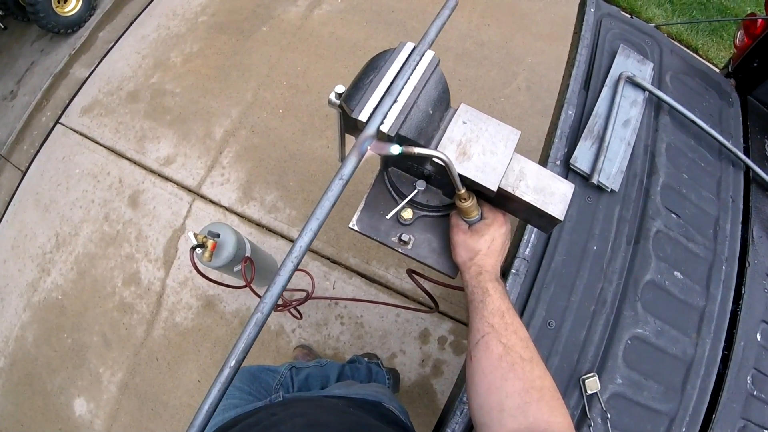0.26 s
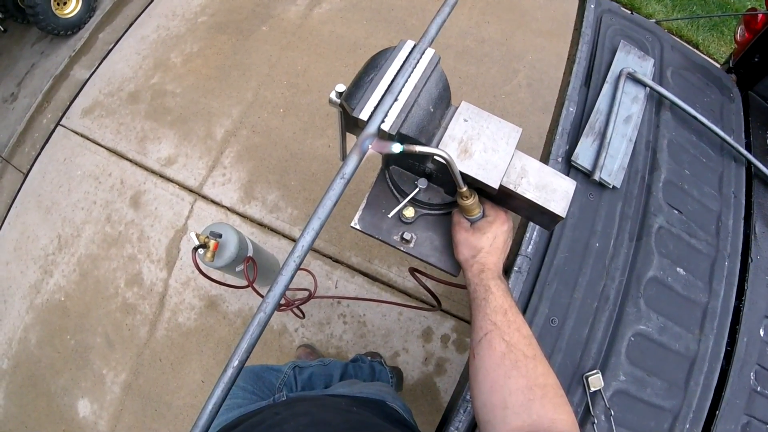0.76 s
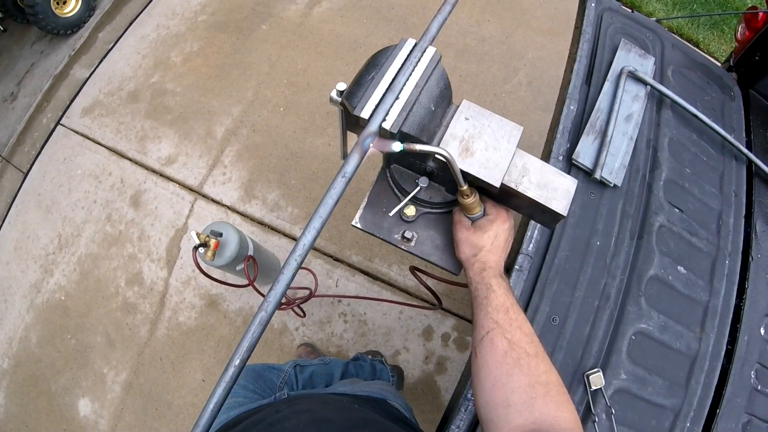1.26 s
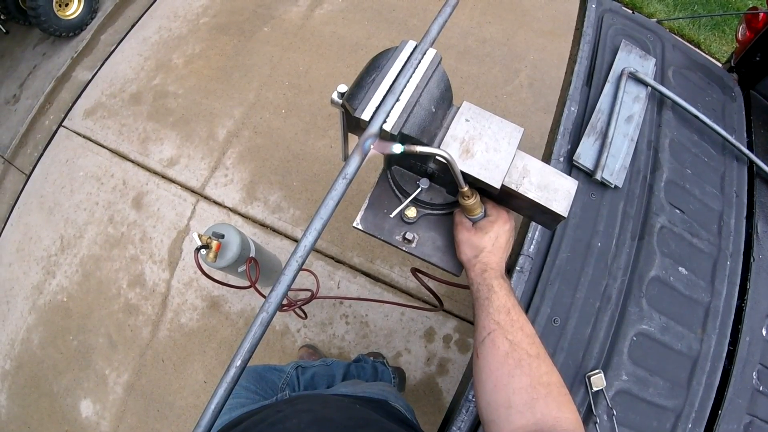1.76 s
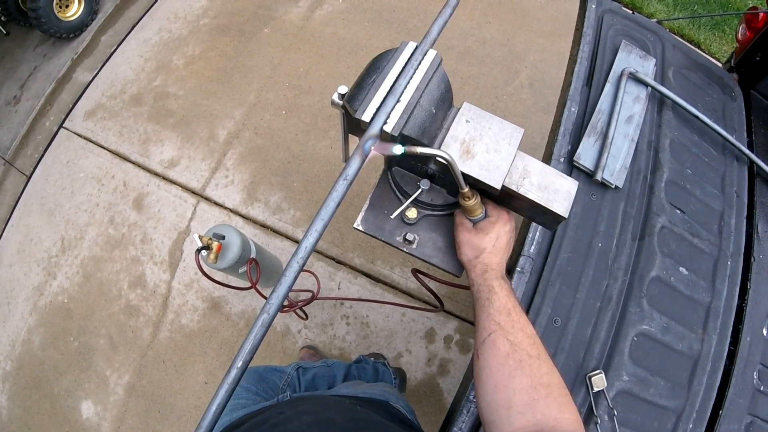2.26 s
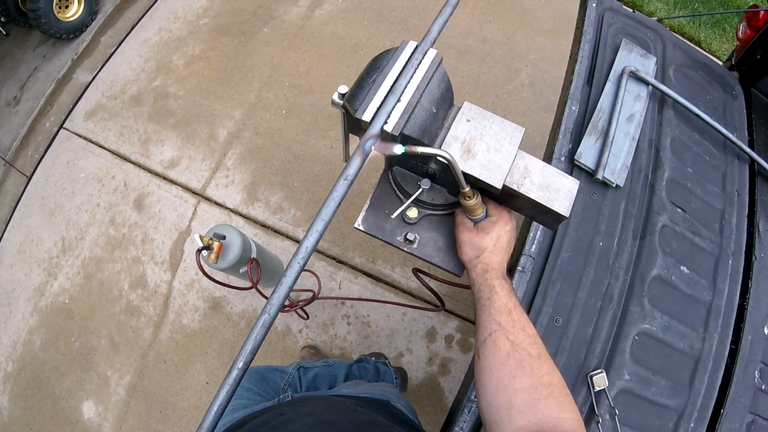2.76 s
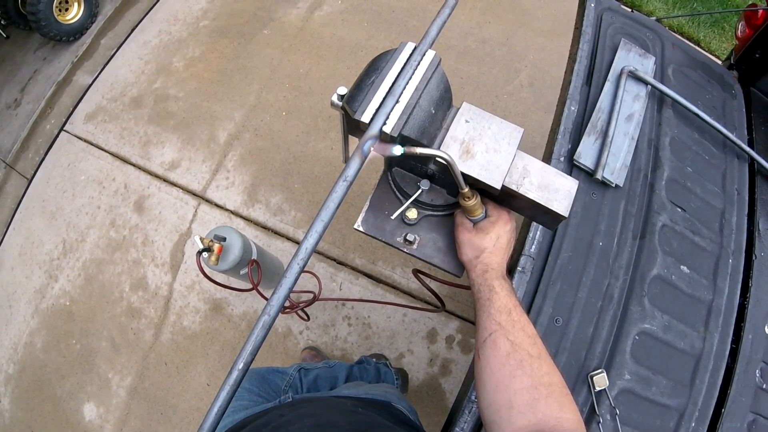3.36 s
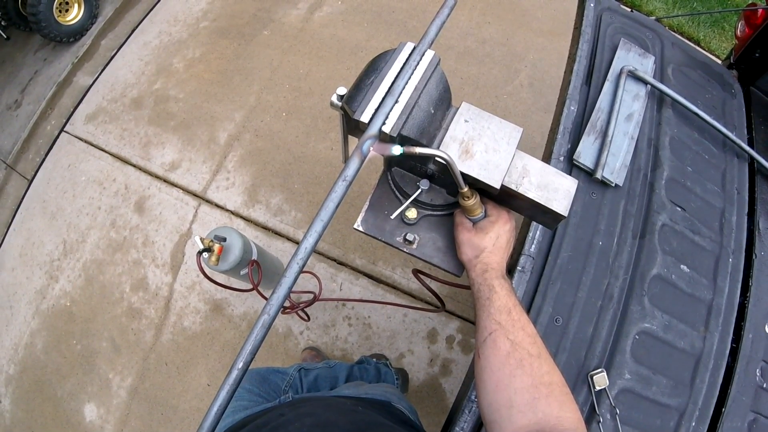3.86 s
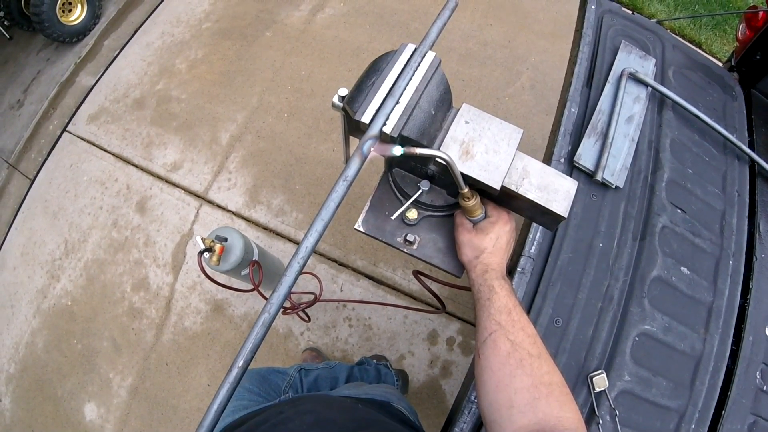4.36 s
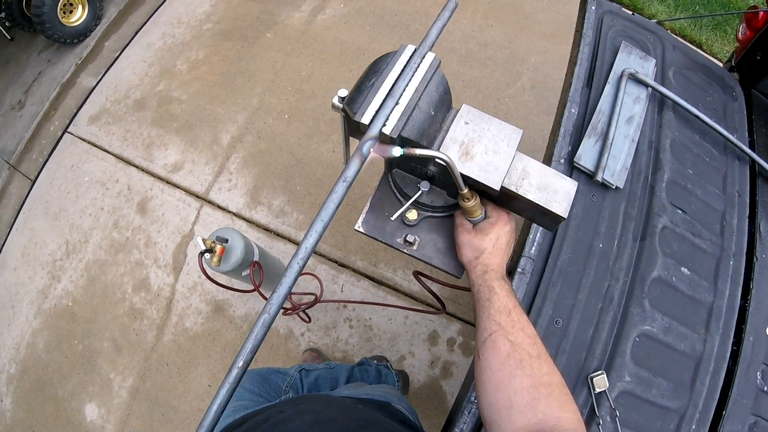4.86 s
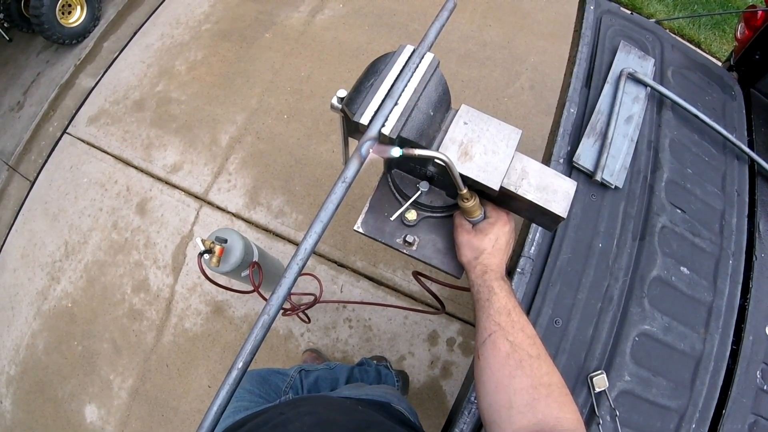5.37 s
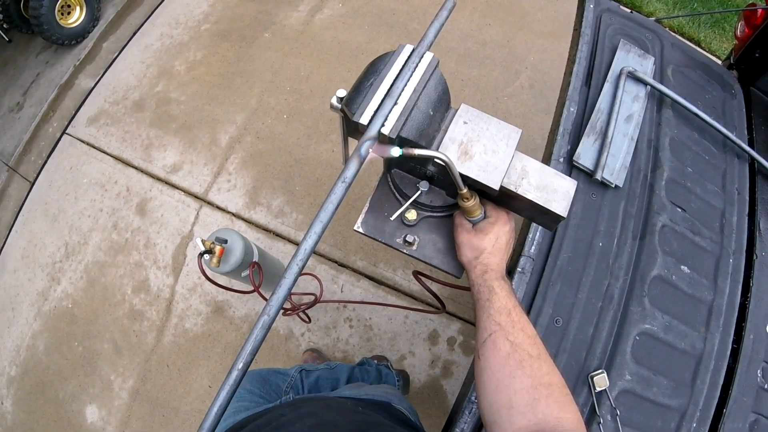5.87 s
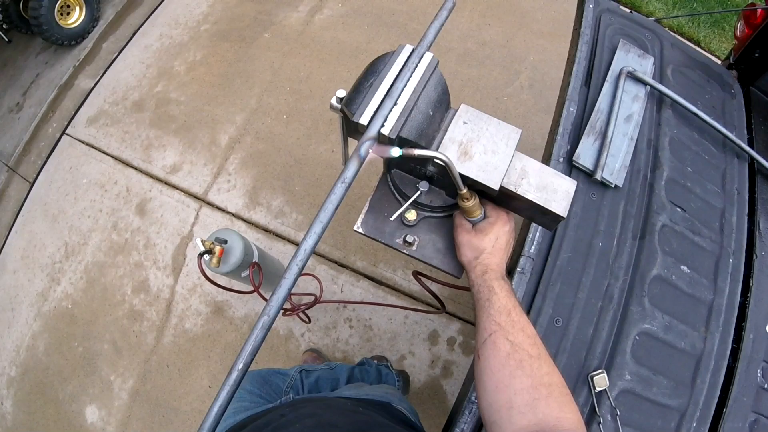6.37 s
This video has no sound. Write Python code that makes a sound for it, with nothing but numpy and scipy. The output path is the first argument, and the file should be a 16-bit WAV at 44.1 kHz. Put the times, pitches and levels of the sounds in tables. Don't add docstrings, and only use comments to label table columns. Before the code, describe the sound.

A gas torch already burning at the start blasts steadily against a steel bar, about an arm's length below a head-worn microphone outdoors. The sound is a loud, dense, bright hiss with a thin low roar and a strong breathy whistle near 5 kHz. It flutters slightly, dips for an instant near five seconds, recovers and continues to the end.

```python
import sys
import numpy as np
from scipy import signal
from scipy.fft import next_fast_len
from scipy.io import wavfile
from scipy.ndimage import uniform_filter1d

SR = 44100
rng = np.random.default_rng(int(sys.argv[2]) if len(sys.argv) > 2 else 0)


def decibels_to_gain(level_db):
    exponent = np.asarray(level_db, float) / 20
    return 10 ** exponent


def put_to_file(sound):
    columns = np.atleast_2d(sound).T
    safe = np.clip(columns, -1, 1)
    whole_steps = np.round(safe * 32767)
    wavfile.write(sys.argv[1], SR, whole_steps.astype(np.int16))


N = 292383
FRAME = 2048


def walk(rows, count, hold):
    steps = rng.standard_normal((rows, count // hold + 1))
    steps = np.repeat(steps, hold, axis=1)[:, :count]
    steps = uniform_filter1d(steps, hold, axis=1)
    steps = uniform_filter1d(steps, hold, axis=1)
    return steps / steps.std()


def band(x, lo_hz, hi_hz):
    return signal.sosfiltfilt(signal.butter(4, [lo_hz, hi_hz], "band", fs=SR, output="sos"), x)


def sag(s):
    # starts_s, lowest_from_s, lowest_to_s, recovered_s, depth_db
    falter = (4.9, 5.04, 5.15, 5.22, -6.5)
    return falter[-1] * np.interp(s, np.sort(falter[:-1]), [0, 1, 1, 0])


def echoes_and_rings(hz):
    # centre_hz, width_hz, height_db
    bells = [(457, 37, 4.5), (580, 194, 5), (746, 71, -9), (948, 132, 9), (1400, 140, 3), (1602, 64, -3),
             (1703, 78, -9), (2280, 600, 7.5), (2654, 213, -6), (2862, 337, 11), (3525, 250, -3.5),
             (3870, 730, 7.5), (4250, 60, -6), (4240, 75, 1), (4881.4, 400, 18.5), (5118, 217, 10),
             (5490, 133, -14), (5944, 510, 10), (6360, 60, -5), (6560, 81, 6), (6467, 270, 6),
             (7090, 410, 5.5), (7490, 290, 11), (9270, 800, 4), (9420, 350, -7.5), (9820, 250, 6),
             (10050, 240, -7), (10720, 650, 12.5), (11230, 370, -20), (11660, 480, 7)]
    return sum(db * np.exp(-np.log(16) * ((hz - f) / width) ** 2) for f, width, db in bells)


def torch(lick_db=0.43, flicker_db=0.18, ring_flicker_db=0.5, jet_flicker_db=1.0):
    # pitch_hz, level_db (per Hz)
    flame_colour = [(20, -36.5), (200, -38), (400, -32.5), (1200, -32), (2000, -34), (3500, -32.5),
                    (4400, -35), (5500, -21), (6800, -31), (8200, -32.5), (9200, -40.5), (10300, -50),
                    (11200, -48), (12300, -62)]
    borders_hz = [1700, 4330, 5520]
    # time_s, flow_db
    gas_flow = [(0.0, 0.5), (1.1, 1.14), (1.4, 0.9), (2.3, 0.16), (2.9, 0.6), (3.5, -0.3), (4.2, -0.5),
                (4.4, -1.5), (5.1, -1.5), (5.4, -0.84), (6.63, -1.0)]
    # level_db, follow (dB per dB of flow), falter_share
    flame_parts = [
        (-39, 1.12, 0.05),
        (-31.5, 0.82, 0.11),
        (-12.5, 0.13, 0.82),
        (-25, 0.93, 0.089),
    ]
    # time_s, ring_hz
    head_tilt = [(0.0, 4988), (4.6, 5003), (4.75, 4965), (5.4, 4946), (5.5, 5026), (6.0, 5040), (6.3, 4980),
                 (6.63, 5020)]
    # time_s, half_length_s, boost_db
    ring_swell_s, ring_swell_half_s, ring_swell_db = (5.4, 0.21, 1.3)

    hz, s, z = signal.stft(rng.standard_normal(N), SR, nperseg=FRAME, noverlap=FRAME * 3 // 4)
    part = np.searchsorted(borders_hz, hz)
    ring = part == 2

    stretch = np.repeat(1 + 0.003 * walk(1, len(s), hold=30), len(hz), axis=0)
    lean = head_tilt[0][1] / np.interp(s, *np.transpose(head_tilt))
    stretch[ring] = lean + 0.002 * walk(1, len(s), hold=8)
    colour_hz, colour_db = np.transpose(flame_colour)
    colour = np.interp(np.log(hz + 1), np.log(colour_hz), colour_db)
    gain = decibels_to_gain(colour[:, None] + echoes_and_rings(hz[:, None] * stretch))

    patches = walk(len(hz) // 32 + 1, len(s), hold=2)[np.arange(len(hz)) // 32]
    patches = uniform_filter1d(patches, size=16, axis=0)
    depth_db = np.array([flicker_db, flicker_db, ring_flicker_db, jet_flicker_db])[part, None]
    gain = gain * decibels_to_gain(lick_db * walk(1, len(s), hold=10) + depth_db * patches)

    flow_db = np.interp(s, *np.transpose(gas_flow))
    levels = []
    for k, (db, follow, falter_share) in enumerate(flame_parts):
        loudness = np.sqrt(np.sum(gain[part == k] ** 2) / gain.size)
        levels.append(decibels_to_gain(db + follow * flow_db + falter_share * sag(s)) / loudness)
    levels = np.array(levels)
    surge_db = 0.5 * walk(1, len(s), hold=3)[0]
    levels[2] *= decibels_to_gain(surge_db + ring_swell_db * np.exp(-((s - ring_swell_s) / ring_swell_half_s) ** 2))
    gain *= uniform_filter1d(levels[part], size=8, axis=0)

    gain *= decibels_to_gain(np.outer(np.clip((hz - 8200) / 1800, 0, 1), sag(s)))
    return signal.istft(z * gain, SR, nperseg=FRAME, noverlap=FRAME * 3 // 4)[1][:N]


def scene():
    return np.tile(torch(), (2, 1))


def limit(x, top_db=-9, squeeze=0.48, react_s=0.0017, from_hz=4300):
    treble = band(x, from_hz, 8600)
    swell = np.abs(signal.hilbert(treble, next_fast_len(N))[:N])
    swell = uniform_filter1d(swell, max(int(react_s * SR), 1))
    gain = decibels_to_gain(2.0) * (1 + (swell / decibels_to_gain(top_db)) ** 2) ** (-squeeze / 2)
    gain *= (1 + (gain * swell / .76) ** 8) ** (-1 / 8)
    return x - treble + treble * gain


def lean_spells(s):
    # start_s, length_s
    long_spells = [(0.106, 0.054), (1.414, 0.12), (1.58, 0.143), (2.477, 0.077), (2.736, 0.075),
                   (3.982, 0.237), (4.335, 0.116), (4.645, 0.112), (5.277, 0.132), (5.809, 0.173),
                   (6.098, 0.17), (6.383, 0.106)]
    blinks_per_s, shortest_s, longest_s = 7, 0.012, 0.045
    draw = rng.random((int(blinks_per_s * N / SR), 2))
    starts = (np.arange(len(draw)) + draw[:, 0]) / blinks_per_s
    blinks = zip(starts, shortest_s + (longest_s - shortest_s) * draw[:, 1])
    spells = [*long_spells, *blinks]
    return sum((s > start - .004) & (s < start + length + .004) for start, length in spells) > 0


def thin_treble(x, starve_db=2.0):
    # from_hz, threshold_db, waver_db
    thresholds = [(1200, -73, 3), (1850, -69, 3), (3100, -68, 3), (3700, -67, 3), (4450, -99, 0),
                  (8300, -80, 2), (9000, -77, 4), (9700, -77, 4), (10350, -74, 3), (11020, -81, 6),
                  (11480, -88, 3), (11950, -84, 6)]
    hz, s, z = signal.stft(x, SR, nperseg=FRAME, noverlap=FRAME * 3 // 4)
    lean = lean_spells(s)
    from_hz, faintest_db, waver_db = np.transpose(thresholds)[:, :, None]
    bar_db = faintest_db + waver_db * walk(len(thresholds), len(s), hold=2) + starve_db * lean + sag(s)
    bar_db = np.vstack([np.full(len(s), -200.), bar_db])[np.searchsorted(from_hz[:, 0], hz)]
    power = uniform_filter1d(np.abs(z) ** 2, size=3, axis=1)
    kept = np.clip((10 * np.log10(power + 1e-20) - bar_db) / 3, 0, 1)
    kept[hz > 11480] *= ~lean
    return signal.istft(z * kept, SR, nperseg=FRAME, noverlap=FRAME * 3 // 4)[1][:N]


def splits():
    # middle_s, low_hz, high_hz, peak_db
    moments = [
        (2.177, 4650, 6250, -6.5),
        (2.177, 6900, 8260, -29.5),
        (3.568, 6900, 8260, -26.5),
    ]
    out, s = np.zeros(N), np.arange(N) / SR
    for at, lo_hz, hi_hz, db in moments:
        noise = band(rng.standard_normal(N), lo_hz, hi_hz)
        if lo_hz < 5000:
            noise = band(noise, 4200, 5400) + .08 * noise
        noise = noise * np.cos(np.clip((s - at) * SR / FRAME, -.5, .5) * np.pi) ** 1.5
        out += decibels_to_gain(db) * noise / np.abs(noise).max()
    return out


def band_limit(x):
    return signal.sosfilt(signal.butter(12, 12150, fs=SR, output="sos"), x)


def record(dry):
    x = limit(dry[0])
    bend = x ** 2 - np.mean(x ** 2)
    x = thin_treble(x + decibels_to_gain(-29.0) * bend)
    apart = splits()
    x = x * (1 - 1.3 * uniform_filter1d(np.abs(apart), size=300))
    return band_limit(np.array([x + apart, x - apart]))


dry = scene()
out = record(dry)
put_to_file(out)
```